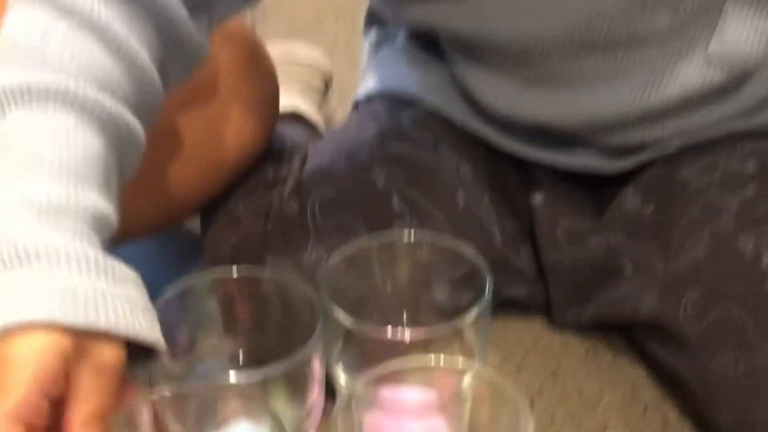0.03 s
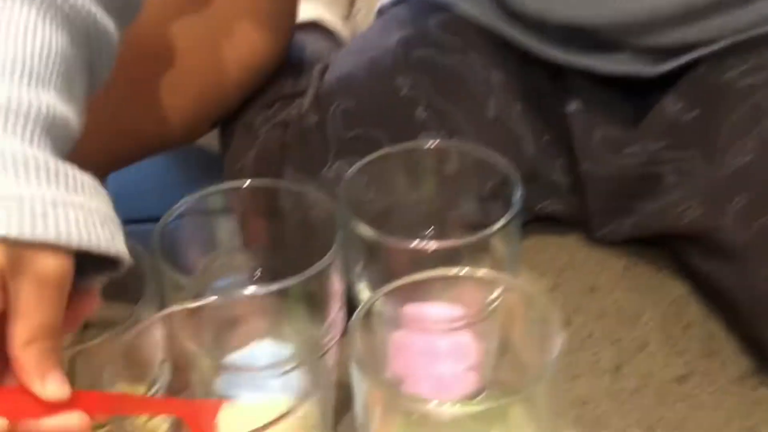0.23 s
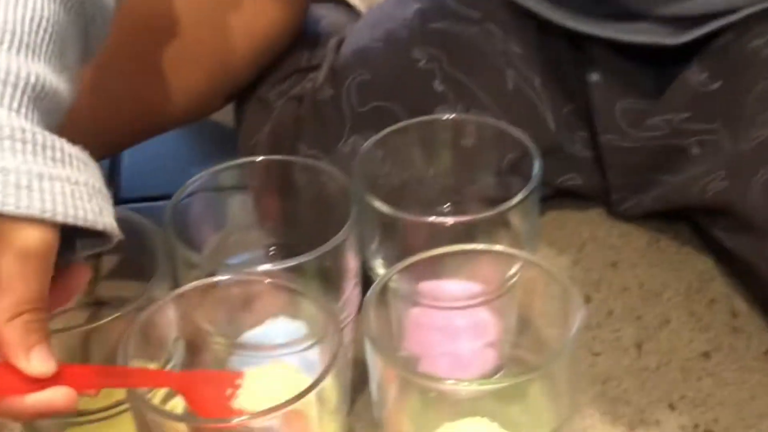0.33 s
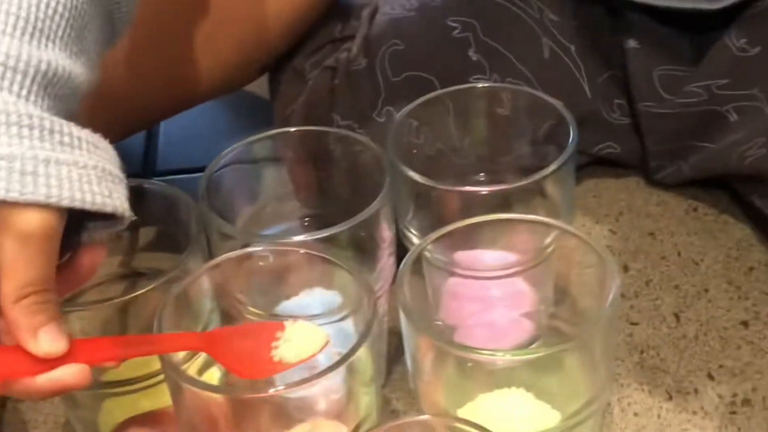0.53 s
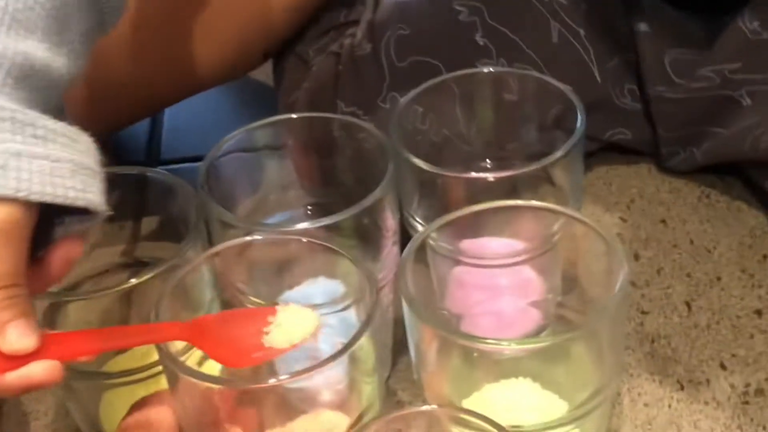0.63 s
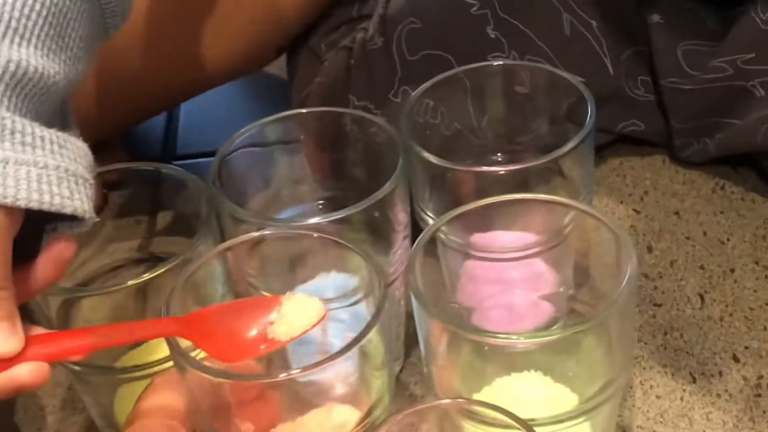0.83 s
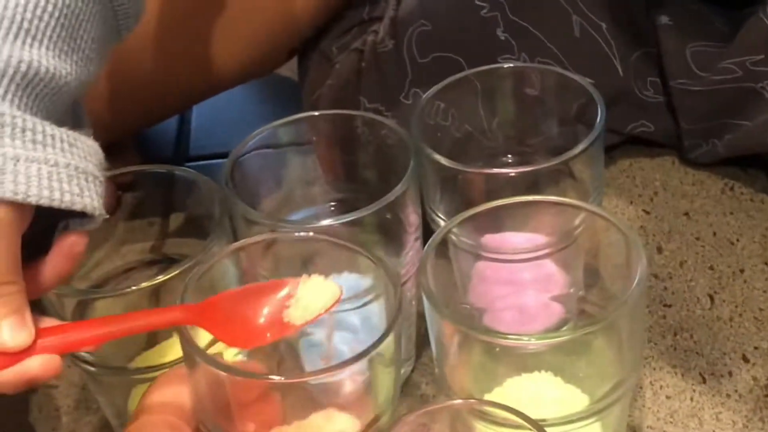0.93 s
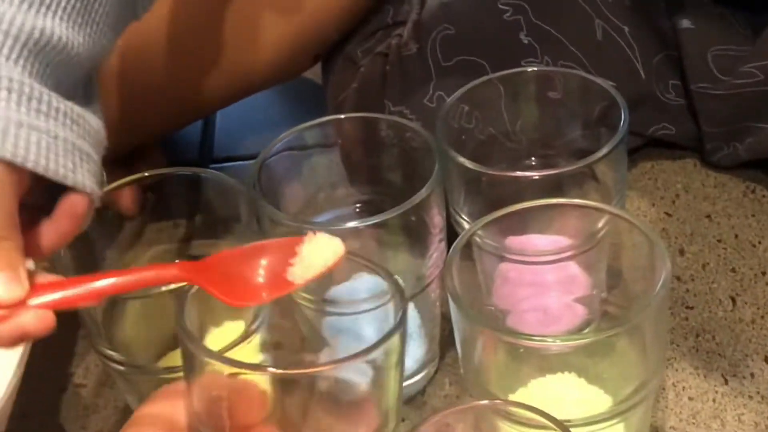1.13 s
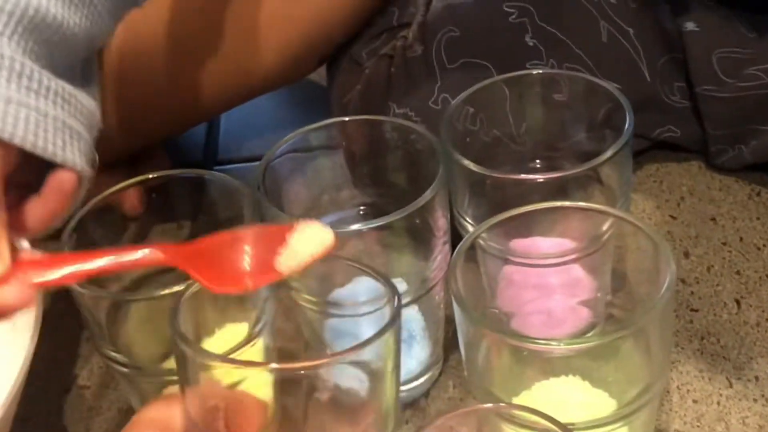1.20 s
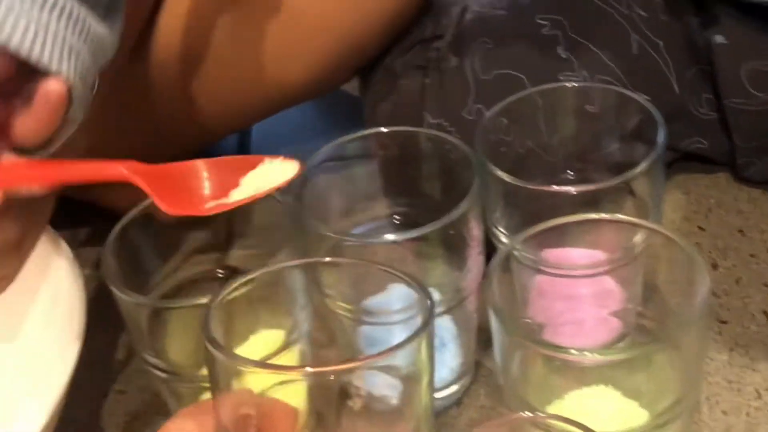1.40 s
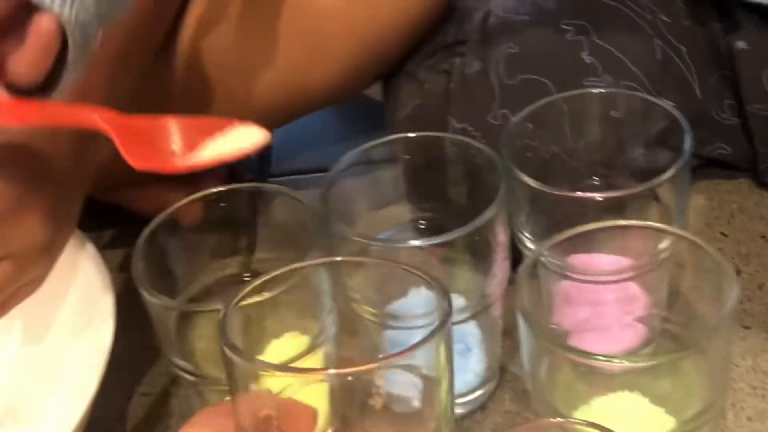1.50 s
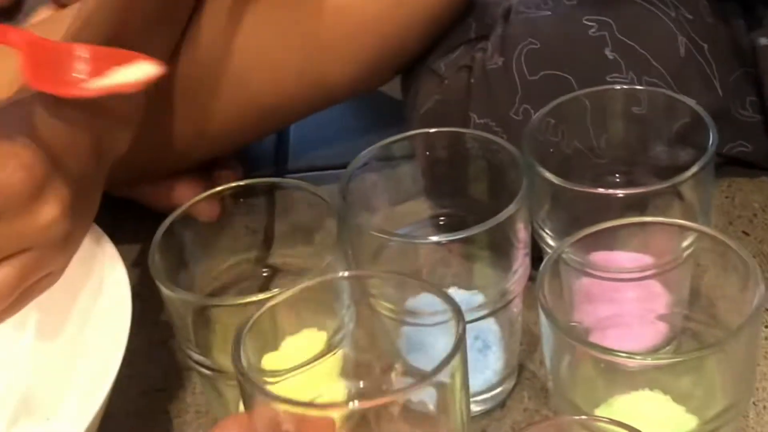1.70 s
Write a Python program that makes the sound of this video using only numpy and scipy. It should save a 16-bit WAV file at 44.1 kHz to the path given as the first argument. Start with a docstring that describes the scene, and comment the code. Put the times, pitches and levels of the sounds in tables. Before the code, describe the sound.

A drinking glass clacks down and rings briefly, then is nudged with soft knocks and scrapes.

```python
"""A quiet room with a hard floor, one small microphone near a huddle of drinking glasses.
A faint jingle dies away, then one glass is set down with a sharp clack: its thick base rings briefly,
its thin wall rings on and the floor thuds. It grazes its neighbour and rocks onto its base over grit.
Two softer knocks and short scrapes follow as it is nudged into place. The room answers briefly;
hands and knees bump softly and sleeves rustle now and then."""
import sys
import numpy as np
from scipy import signal
from scipy.fft import rfft, irfft, next_fast_len
from scipy.io import wavfile

SR = 44100
rng = np.random.default_rng(int(sys.argv[2]) if len(sys.argv) > 2 else 0)


def master(y):
    """Save y as 16-bit WAV."""
    cut = np.clip(np.atleast_2d(y).T, -1, 1)
    pcm = np.round(cut * 32767)  # scale
    wavfile.write(sys.argv[1], SR, pcm.astype(np.int16))


N = 77175
AGE = np.arange(int(.6 * SR)) / SR  # seconds since a contact

# the glass's thick base, damped by the floor: pitch_hz, level_db, t60_s
BASE_MODES = [(391.5, -30.5, 0.11), (470, -22.5, 0.027), (674, -21.5, 0.022), (895, -13, 0.014),
              (1277.6, -8, 0.017), (1510, -14, .02), (2027, -15.5, .016), (2565, -20, .014),
              (2990, -9.5, 0.011), (3360, -8.5, 0.0081), (3890, -23, 0.0089), (4950, -27.5, 0.0029)]
# its thin wall, where a close pair of modes beats: pitch_hz, level_db, t60_s
WALL_MODES = [(2483, 1, 0.25), (2456, -5.5, 0.41), (5835, -17.5, 0.19), (8803, -32.5, .4),
              (11400, -53.5, 0.73)]


def amp(db):
    """Decibels to gain."""
    return 10 ** (np.asarray(db) / 20)


def fade(t, t60):
    """Exponential decay, 60 dB down after t60 seconds."""
    return amp(-60 * t / np.maximum(t60, 1e-4))


def along(points, hz):
    """Interpolate (frequency, value) points on a log frequency axis."""
    freqs, values = np.transpose(points)
    return np.interp(np.log(hz + 1), np.log(freqs + 1), values)


def filtered(x, response):
    """Filter x by a gain given as a function of frequency."""
    size = next_fast_len(2 * len(x))
    return irfft(rfft(x, size) * response(np.fft.rfftfreq(size, 1 / SR)), size)[:len(x)]


def noise(spectrum, size):
    """Coloured noise of rms 1."""
    x = filtered(rng.standard_normal(size), lambda hz: amp(along(spectrum, hz)))
    return x / x.std()


def swells(rows, spectrum):
    """Noise that rises and falls in a bell curve for each row of time_s, level_db, width_s."""
    t = np.arange(N) / SR
    envelope = sum(amp(db) * np.exp(-.5 * ((t - s) / width) ** 2) for s, db, width in rows)
    return noise(spectrum, N) * envelope


def impulses(per_s, length_s):
    """A short run of tiny impacts, random in time and strength."""
    hits = rng.random(len(AGE)) < per_s / SR
    return hits * rng.standard_normal(len(AGE)) * (AGE < length_s)


def ring(modes, tilt_db=0, scatter_db=0):
    """Damped modes that waver slightly in pitch, tilted by tilt_db per octave above the first."""
    attack_s, waver_share = 0.000087, 0.0018
    out = np.zeros(len(AGE))
    for hz, db, t60 in modes:
        level_db = db + tilt_db * np.log2(hz / modes[0][0]) + scatter_db * rng.standard_normal()
        drift = np.interp(AGE * 100, np.arange(64), rng.standard_normal(64))
        turns = rng.random() + np.cumsum(hz * (1 + waver_share * drift)) / SR
        out += amp(level_db) * fade(AGE, t60) * np.sin(2 * np.pi * turns)
    return out * (1 - np.exp(-AGE / attack_s))


def soften(sound, hardness_hz):
    """A contact passes little treble above its hardness."""
    return signal.sosfilt(signal.butter(4, min(hardness_hz, SR / 3), fs=SR, output="sos"), sound)


def add(track, start_s, sound):
    """Lay a sound into the track."""
    part = track[max(0, round(start_s * SR)):][:len(sound)]
    part += sound[:len(part)]


def room_tone(level_db=-62.5):
    """The still room: a faint, steady rumble with a little hiss."""
    # room tone spectrum: freq_hz, level_db
    air = [(25, -16), (45, -4.5), (85, 2.5), (120, -6), (160, -2), (230, -11.5), (400, -11.5), (1000, -17),
           (2400, -19), (6000, -23), (9000, -27.5), (15500, -38.5)]
    return amp(level_db) * noise(air, N)


def in_room(sound, delay_s=0.0013, build_s=.006):
    """The direct sound at the microphone, its diffuse echo and the room's low standing waves."""
    # decay of the echo: freq_hz, t60_s
    echo_decay = [(100, 0.25), (400, 0.36), (800, 0.41), (1300, 0.35), (1700, 0.42), (2500, 0.44),
                  (5000, 0.23), (12000, 0.38)]
    # colour of the echo: freq_hz, level_db
    echo_colour = [(70, -5.5), (160, -6), (400, -3), (700, -4), (1200, -3.5), (2000, -6.5), (3200, -12.5),
                   (6000, -6.5), (12000, -10.5)]
    # standing waves: pitch_hz, level_db, t60_s
    standing_waves = [(157.9, -60, .42), (273, -62, 0.53), (357, -57, .45), (398, -52, 0.19),
                      (467, -60, .2), (659, -54, 0.4), (825, -53.5, .25), (982, -58, 0.36),
                      (1110, -55.5, 0.51), (1269, -63.5, .3), (1279, -60, 0.094)]
    hz, t, bands = signal.stft(rng.standard_normal(len(AGE)), SR, nperseg=256)
    t60 = along(echo_decay, hz)[:, None]
    unit_energy = np.sqrt(2 * np.log(1000) / (SR * t60))
    gain = amp(along(echo_colour, hz))[:, None] * unit_energy
    echo = signal.istft(bands * gain * fade(t, t60), SR, nperseg=256)[1][:len(AGE)]
    tail = echo * np.clip((AGE - delay_s) / build_s, 0, 1) + ring(standing_waves)
    return sound + signal.fftconvolve(sound, tail)[:len(sound)]


def sleeves():
    """Cloth rustles in brief, faint swells."""
    # sleeve movements: time_s, level_db, width_s
    rustles = [(.165, -64, 0.019), (.22, -60.5, 0.021), (1.45, -72.5, 0.023), (1.67, -86, 0.031)]
    # cloth spectrum: freq_hz, level_db
    cloth = [(200, -10), (1000, 8), (3000, 1.5), (7000, -3.5), (11000, 0.5), (15500, -17.5)]
    return swells(rustles, cloth)


def hands_and_knees():
    """Hands and knees make soft, dull bumps."""
    # bumps: time_s, level_db, width_s
    bumps = [(.156, -50.5, 0.0054), (.575, -63.5, 0.019), (1.2, -66, 0.0099), (1.425, -60, 0.0052),
             (1.665, -63.5, .022), (1.735, -62.5, 0.025)]
    # bump spectrum: freq_hz, level_db
    bump_colour = [(30, 5), (80, -2), (160, -9), (260, 3.5), (400, -18.5), (1200, -16), (3000, -28),
                   (12000, -50)]
    return swells(bumps, bump_colour)


def jingle(chatter_db=-42, chatter_t60_s=0.26, rub_width_s=0.0079):
    """The huddled glasses ring faintly while their rims chatter to rest."""
    # the glasses ringing together: pitch_hz, level_db, t60_s
    huddle_modes = [(700, -2.5, .15), (1223, -11.5, 0.19), (2390, -4, .22), (2604, -4.5, .25),
                    (2810, -16, .2), (2985, -10, 0.11), (5850, -7.5, .17), (6024, 3.5, .18),
                    (6288, -2.5, .17), (8812, 0.5, 0.29), (8920, -6, .2), (10330, -6, 0.2),
                    (11400, -5, 0.2)]
    # their contacts: start_s, level_db
    contacts = [(.001, -51), (0.016, -59)]
    # spectrum of rubbing rims: freq_hz, level_db
    chatter = [(300, -10.5), (700, -2), (1800, -13.5), (2300, -14), (2600, 6), (3100, -0.5), (4000, -14.5),
               (5200, -26.5), (6000, 1.5), (7200, -24.5), (10500, -17), (11600, -19.5), (13000, -33.5)]
    # brief rim rubs: time_s, level_db
    rubs = [(0.102, -58), (0.121, -59), (0.217, -62.5)]
    out = swells([(s, db, rub_width_s) for s, db in rubs], chatter)
    add(out, 0, amp(chatter_db) * noise(chatter, len(AGE)) * fade(AGE, chatter_t60_s))
    for start_s, db in contacts:
        add(out, start_s, in_room(amp(db) * ring(huddle_modes, scatter_db=1.5)))
    return out


def crunch(start_s=0.26, level_db=-56, grains_per_s=1500):
    """Grit crunches under the glass while it rocks."""
    # grit spectrum: freq_hz, level_db
    grit_colour = [(3000, -15), (6000, 1), (9000, -4.5), (13000, -2.5), (15500, -9.5)]
    out = np.zeros(N)
    grains = impulses(grains_per_s, length_s=0.068) * np.sqrt(SR / grains_per_s)
    grit = filtered(grains, lambda hz: amp(along(grit_colour, hz)))
    add(out, start_s, in_room(amp(level_db) * grit))
    return out


def scrapes(slips_per_s=1600, hardness_hz=1686):
    """Dense little slips ring the base while the glass slides on the floor."""
    # slides: start_s, length_s, level_db
    slides = [(0.685, 0.018, -52), (0.727, 0.019, -49), (0.851, 0.048, -43)]
    # body of the scrape: freq_hz, gain_db
    body = [(100, -30), (260, -12), (370, 1.5), (550, 0), (900, -2.5), (1300, -6.5), (2000, -1.5)]
    out = np.zeros(N)
    for start_s, length_s, db in slides:
        slips = impulses(slips_per_s, length_s)
        base = signal.fftconvolve(slips, ring(BASE_MODES))[:len(AGE)]
        rub = filtered(soften(base, hardness_hz), lambda hz: amp(along(body, hz)))
        rms = np.sqrt((np.sum(rub ** 2) + 1e-12) / (length_s * SR))
        add(out, start_s, in_room(amp(db) * rub / rms))
    return out


def grazes(tick_t60_s=0.016):
    """Glass on glass: a graze ticks and favours the high wall modes; a touch rings the neighbour."""
    # rim grazes: start_s, tick_db, wall_db
    rim_contacts = [(0.2456, -58.5, -45.5), (.2516, -33, -42), (.2575, -40, -38.5), (0.716, -66, -90)]
    # tick spectrum: freq_hz, level_db
    tick_colour = [(500, -19.5), (3000, -3), (6000, 0), (10000, -7), (15500, -6.5)]
    # the neighbouring glass: pitch_hz, level_db, t60_s
    neighbour_modes = [(3106, 6.5, 0.058), (3114, -13, 0.88), (6800, -21, 0.21)]
    # touches on it: start_s, level_db
    touches = [(0.7002, -47.5)]
    out = np.zeros(N)
    for start_s, tick_db, wall_db in rim_contacts:
        tick = amp(tick_db) * noise(tick_colour, len(AGE)) * fade(AGE, tick_t60_s)
        wall = amp(wall_db) * ring(WALL_MODES, tilt_db=12.5)
        add(out, start_s, in_room(tick + wall))
    for start_s, db in touches:
        add(out, start_s, in_room(amp(db) * ring(neighbour_modes)))
    return out


def knocks(snap_t60_s=0.02, thud_rise_s=0.001):
    """The base lands with a snap and a clack, duller if soft; the floor thuds and the wall rings on."""
    # base on floor: start_s, clack_db, hardness_hz, thud_db, wall_db, snap_db
    landings = [(.2432, 0.5, 4340, -27.5, -60.5, -22), (0.2579, -42, 2000, -29.5, -56, -59),
                (0.2835, -7, 4600, -42, -32, -31), (.2865, -17.5, 3460, -44, -36, -29),
                (0.308, -9.5, 1900, -34, -80, -40.5), (0.7019, -26, 2830, -47, -61.5, -55.5),
                (0.7145, -27, 1700, -45, -83, -60.5), (0.8574, -28, 1580, -39.5, -87, -80),
                (0.8858, -20, 2170, -35, -68, -56.5)]
    # snap of a hard contact: freq_hz, level_db
    snap_colour = [(1000, -13.5), (4000, 11), (7000, -6), (8800, -2.5), (10500, -4.5), (15000, -29)]
    # low thud of the floor: pitch_hz, level_db, t60_s
    floor_modes = [(75, -14.5, .12), (125, -9.5, 0.024), (158, -1, .08), (205, -2.5, 0.051),
                   (279, -11, .09)]
    out = np.zeros(N)
    for start_s, clack_db, hardness_hz, thud_db, wall_db, snap_db in landings:
        clack = amp(clack_db) * soften(ring(BASE_MODES, scatter_db=2.5), hardness_hz)
        snap = amp(snap_db) * noise(snap_colour, len(AGE)) * fade(AGE, snap_t60_s)
        thud = amp(thud_db) * ring(floor_modes) * (1 - np.exp(-AGE / thud_rise_s))
        wall = amp(wall_db) * ring(WALL_MODES)
        add(out, start_s, in_room(clack + snap + thud + wall))
    return out


def scene():
    """Glasses in front, small movements and room tone behind, in mono."""
    glasses = knocks() + crunch() + scrapes() + grazes() + jingle()
    return (glasses + hands_and_knees() + sleeves() + room_tone())[None]


def record(dry):
    """The small microphone drops the deep bass and the very top of the treble."""
    low_cut_hz, top_hz = 65, 15900
    thin = signal.sosfilt(signal.butter(4, low_cut_hz, "high", fs=SR, output="sos"), dry[0])
    return filtered(thin, lambda hz: hz < top_hz)[None]


dry = scene()
out = record(dry)
master(out)
```